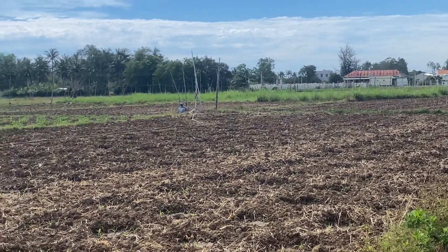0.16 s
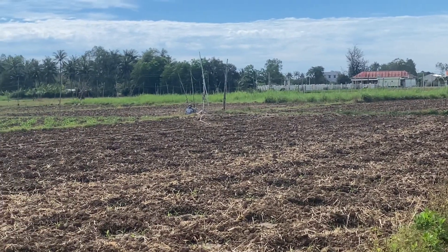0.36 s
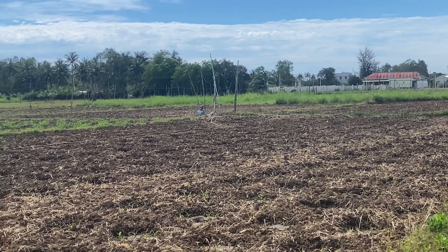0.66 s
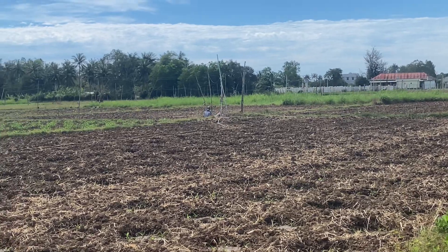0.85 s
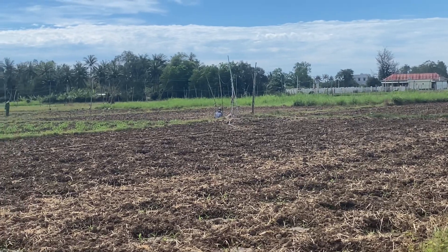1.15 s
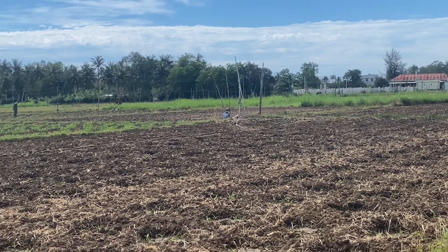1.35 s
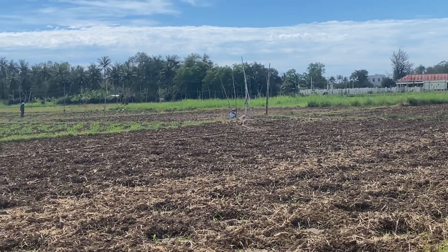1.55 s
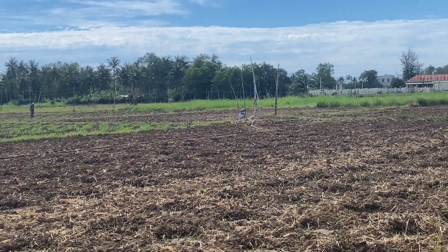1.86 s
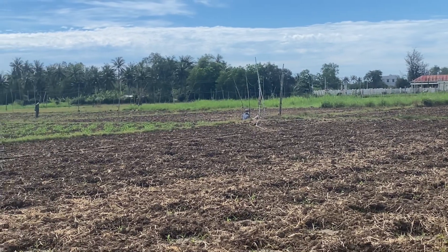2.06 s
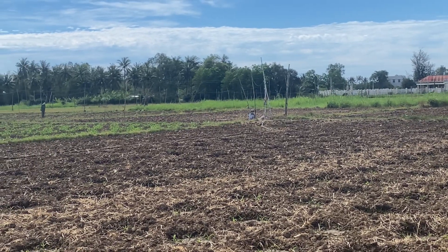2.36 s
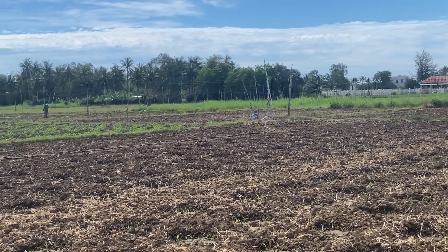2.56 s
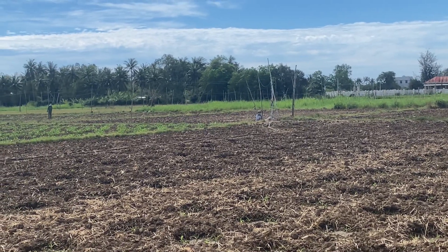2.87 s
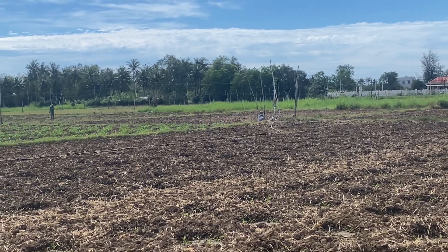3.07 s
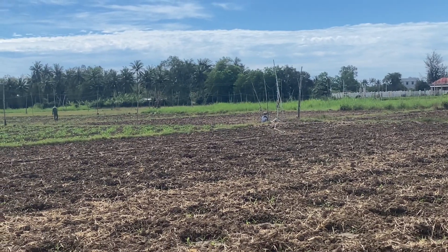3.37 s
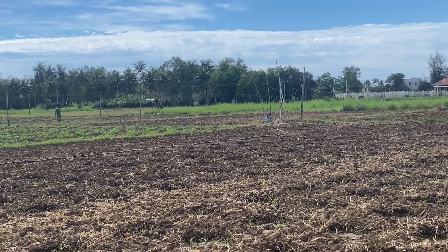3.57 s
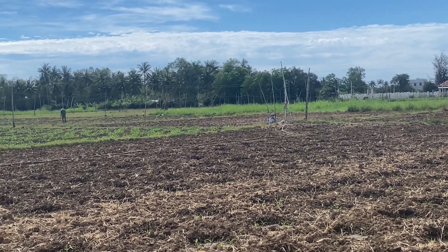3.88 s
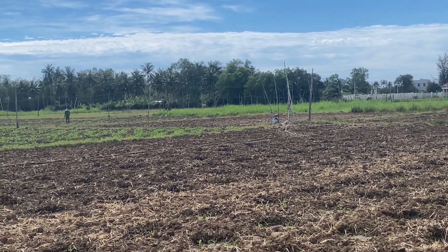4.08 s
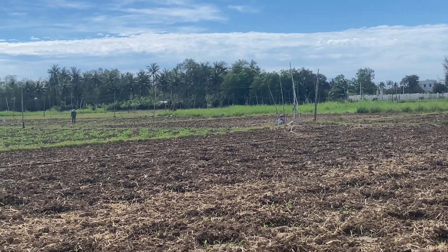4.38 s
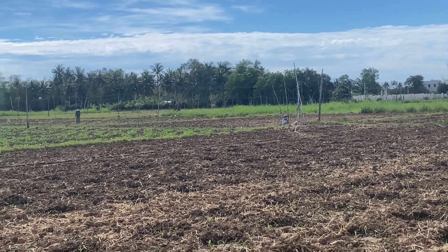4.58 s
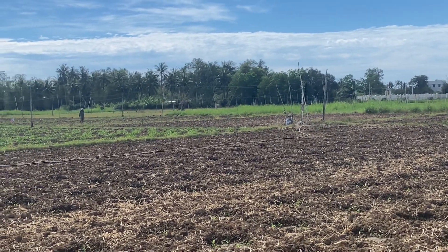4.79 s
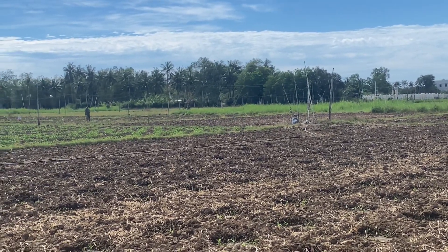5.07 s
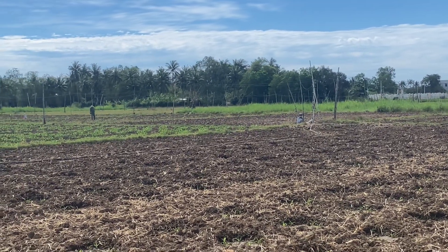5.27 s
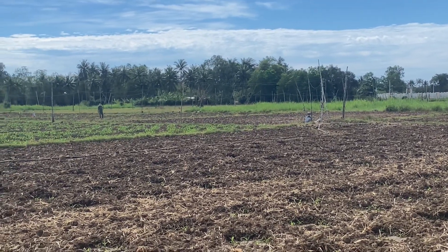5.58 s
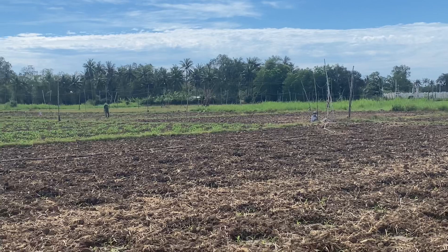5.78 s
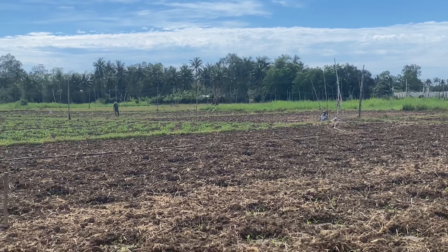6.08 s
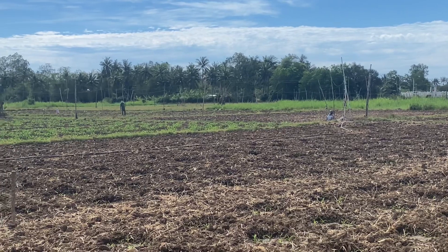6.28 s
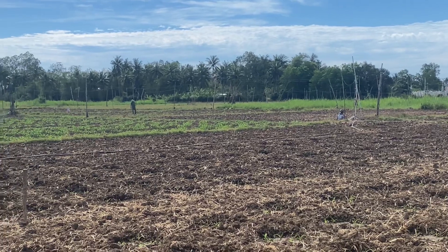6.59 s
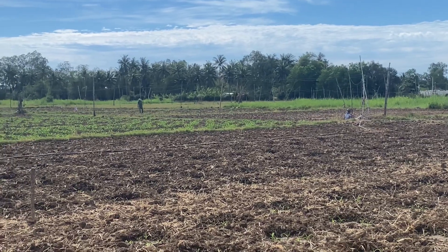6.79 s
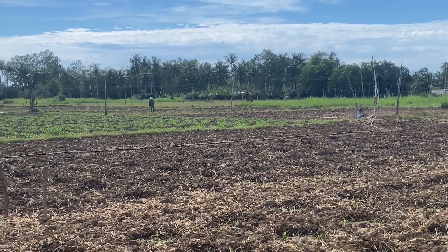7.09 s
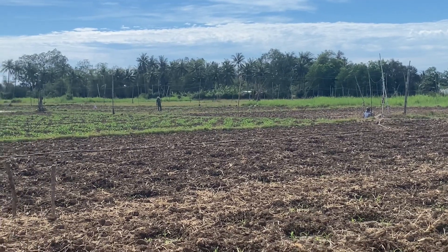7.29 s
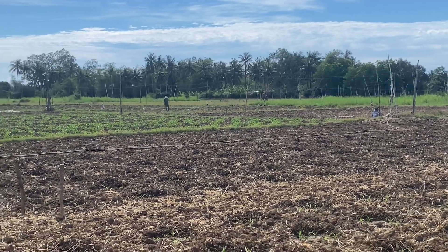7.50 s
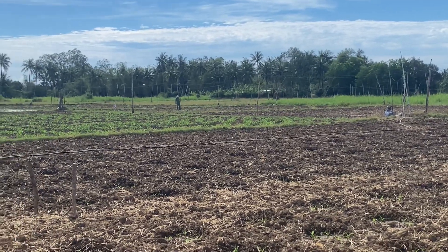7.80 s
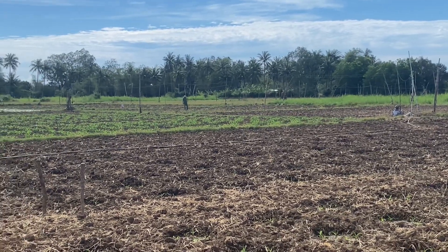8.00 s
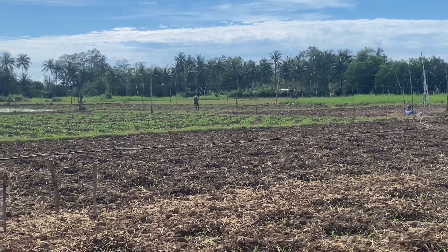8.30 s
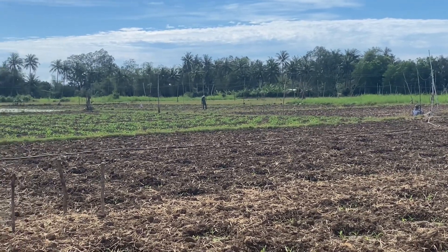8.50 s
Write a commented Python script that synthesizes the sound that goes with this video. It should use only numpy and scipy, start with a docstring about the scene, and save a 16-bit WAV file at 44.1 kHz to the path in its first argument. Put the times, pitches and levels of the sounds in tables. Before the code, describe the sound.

Small birds chirp in the distance as a breeze softly buffets the microphone and a faraway engine faintly chugs.

```python
"""Light wind over open farmland

Turbulent eddies thump on the microphone above the rumble of a light breeze. Small birds chirp all
round at a distance, each call a near-pure tone from the syrinx; lower calls come from the tree line.
Far away a one-cylinder engine chugs, each firing ringing its exhaust pipe. Behind them lie a soft wash
of leaves, a low drone and a brief opening hiss, and the stubble crunches faintly underfoot."""
import sys
import numpy as np
from scipy import signal
from scipy.fft import rfft, irfft, next_fast_len
from scipy.io import wavfile
from scipy.ndimage import uniform_filter1d

SR = 44100
rng = np.random.default_rng(int(sys.argv[2]) if len(sys.argv) > 2 else 0)


def generate_wav(signal):
    """Clip the signal to [-1, 1] and save it as 16-bit WAV at the path in sys.argv[1]."""
    frames = np.transpose(np.atleast_2d(signal))
    scaled = np.clip(frames, -1, 1) * 32767
    pcm = np.round(scaled).astype(np.int16)
    wavfile.write(sys.argv[1], SR, pcm)


N = 381465
TIME = np.arange(N) / SR


# strength of the breeze: (time [s], level [dB])
BREEZE = [(0.0, -58), (0.86, -61.5), (1.03, -62), (1.71, -65), (2.25, -60.5), (2.8, -59.5), (2.98, -53),
          (3.16, -45), (3.44, -64), (3.73, -64.5), (4.17, -58.5), (5.35, -61.5), (5.47, -56.5),
          (6.48, -60.5), (6.82, -76), (7.03, -61), (7.18, -55), (7.68, -58.5), (7.85, -51.5), (8.65, -54.5)]
# spectrum of the turbulence: (frequency [Hz], relative density [dB])
RUMBLE_SPECTRUM = [(12, -56), (25, -36.5), (42, 1), (70, 5.5), (100, -10), (150, -14.5), (250, -22),
                   (600, -53), (2000, -88)]
# large eddies at their crests: (time [s], peak level [dB], frequency [Hz])
LARGE_EDDIES = [(0.052, -34, 115), (0.063, -30, 180), (0.079, -33, 170), (0.099, -35, 95.2),
                (0.375, -43.5, 90), (0.667, -30.5, 94), (0.742, -36, 80), (0.768, -36, 65),
                (1.299, -36.5, 113), (1.365, -47.5, 84.5), (2.268, -44.5, 107), (2.32, -44.5, 68.9),
                (2.45, -48, 69.4), (2.64, -38, 86), (2.915, -36, 90), (2.932, -35.5, 113),
                (3.05, -38.5, 94.6), (3.105, -29, 101.2), (3.14, -25.5, 84.7), (3.156, -21.5, 90),
                (3.255, -29, 82.5), (3.295, -38, 65), (3.972, -30.5, 134), (4.148, -43, 79.1),
                (4.485, -44.5, 90), (4.636, -41, 79.4), (4.69, -46, 95), (5.156, -36, 105),
                (5.55, -38.5, 87.8), (5.6, -37, 101.2), (5.85, -42, 113.5), (5.91, -44, 79.4),
                (6.067, -44.5, 79.5), (6.163, -42, 116), (6.176, -44, 120), (6.27, -48, 93.6),
                (6.365, -39.5, 100), (6.42, -37.5, 122), (7.312, -39, 85.9), (7.663, -39.5, 101),
                (7.757, -34.5, 77), (7.81, -40, 65), (7.9, -34.5, 66.6), (7.951, -29, 80),
                (8.02, -31.5, 70), (8.092, -37.5, 71.6), (8.361, -25, 74.6), (8.433, -39, 60)]

def wind():
    """Turbulence: pressure at the microphone fluctuates as a low rumble with distinct eddies on top."""
    level_db = curve(BREEZE, TIME) + 2.0 * wander(N, hz=11)
    rumble = coloured_noise(RUMBLE_SPECTRUM, patchy_db=1.5) * amp(level_db + 3.0)
    rumble = signal.sosfilt(signal.butter(4, 33, "high", fs=SR, output="sos"), rumble)
    rows = [*LARGE_EDDIES, *small_eddies()]
    shared = eddies(rows, ragged=.11)
    apart = eddies(rows, ragged=.35)  # the swirl differs from port to port
    return (rumble + shared) * amp([[-.3], [.3]]) + amp(-14.5) * np.array([apart, -apart])


def eddies(rows, ragged, rise_cycles=1.277, spread=0.62, sag=1.226, port_hz=48.6):
    """Pressure transients: each eddy slaps the microphone port with a few swings that slow as they die."""
    out, t = np.zeros(N), np.arange(1, SR // 7) / SR
    for start, db, hz in rows:
        rise = rise_cycles / hz
        age = t / rise  # 1 at the crest
        pitch = port_hz + (hz - port_hz) * np.exp(sag * (1 - age))  # sinks towards the port's low limit
        pitch *= np.exp(ragged * wander(len(t), hz=90))
        swing = np.sin(2 * np.pi * (np.cumsum(pitch) / SR + rng.random()))
        envelope = np.exp(-.5 * (np.log(age) / spread) ** 2) * np.cos(np.pi / 2 * t / t[-1])
        add(out, start - rise, amp(db) * envelope * swing)
    return out


def small_eddies(per_second=4, over_breeze_db=8, low_hz=65, high_hz=135):
    """Random arrivals: small eddies scale with the breeze. Returns rows like those of LARGE_EDDIES."""
    when, size, chance = rng.random((100, 3)).T
    crests = when * TIME[-1]
    db = curve(BREEZE, crests) + over_breeze_db
    hz = high_hz * (low_hz / high_hz) ** size
    return np.transpose([crests, db, hz])[chance < per_second * TIME[-1] / len(crests)]


def birds(cutoff_hz=7400):
    """Propagation outdoors: ground and trees scatter the calls, and air absorption removes their top."""
    clear, near, edge = clear_calls(), near_calls(), edge_calls()
    far = rasps() + chatter()
    trees = tree_line_calls()
    mix = (whistles()
           + scattered(clear, wet_db=-6.5, t60=0.15)
           + scattered(near, wet_db=-4.0, t60=0.18)
           + scattered(edge, wet_db=-1.5, t60=0.25)
           + scattered(far, wet_db=3.5, t60=0.1)
           + scattered(trees, wet_db=3.0, t60=0.11))
    return signal.sosfilt(signal.butter(8, cutoff_hz, fs=SR, output="sos"), mix)


def syrinx(length, hz, contour, rough, overtone_db, flutter_db=2.5, sway_db=1.5, trill=0, trill_hz=105):
    """Modulation of a near-pure tone: jitter roughens it, a trill chops it into quick falling pulses."""
    progress = np.linspace(0, 1, int(max(length, .01) * SR))
    size = len(progress)
    at, bend, loudness = np.transpose(contour)
    beat = 2 * np.pi * (trill_hz * length * progress + rng.random() + .15 * wander(size, hz=45))
    waver = 1 + rough * wander(size, hz=460) - trill * np.sin(beat)
    pitch = hz * np.interp(progress, at, bend) * waver
    phase = 2 * np.pi * np.cumsum(pitch) / SR
    overtone = amp(overtone_db) * np.sin(2 * phase) / (1 + (pitch / 3600) ** 10)  # air absorption
    pulses = (1 + np.cos(beat)) if trill else 1
    flutter = amp(flutter_db * wander(size, hz=113) + sway_db * wander(size, hz=26))
    envelope = np.interp(progress, at, loudness) * signal.windows.tukey(size, .15)
    return evened((np.sin(phase) + overtone) * envelope * pulses * flutter)


def calls(rows, contour, **voice):
    """Superposition: calls of one kind share a contour, scaled in duration, pitch and level."""
    out = np.zeros(N)
    for start, length, hz, db in rows:
        add(out, start, amp(db) * syrinx(length, hz, contour, **voice))
    return out


def glides(rows, **voice):
    """Linear frequency sweeps: each call slides from just under its first pitch to its last."""
    out = np.zeros(N)
    for start, length, first_hz, last_hz, db in rows:
        contour = [(0, 0.97, 0.84), (1, last_hz / first_hz, 0.95)]
        add(out, start, amp(db) * syrinx(length, first_hz, contour, overtone_db=-28, **voice))
    return out


# two-note chirrups: (time [s], top pitch [Hz], level [dB])
CHIRRUPS = [(1.043, 3020, -64), (1.2, 2950, -65.5), (1.35, 3200, -64.5), (1.548, 2930, -65.5),
            (1.796, 2956, -66), (2.018, 3000, -67.5), (2.274, 2880, -69.5), (2.536, 2926, -72),
            (2.816, 2980, -70.5), (3.092, 2960, -68), (3.376, 2950, -68), (3.652, 2920, -66.5),
            (3.938, 2940, -66), (4.22, 2950, -65.5), (4.441, 3110, -69), (4.709, 2840, -66.5),
            (4.98, 3000, -67.5), (5.227, 2940, -68), (5.566, 2920, -66), (5.922, 2930, -70)]
# calls over the open field: (time [s], duration [s], reference pitch [Hz], level [dB])
SLURS = [(5.86, .105, 2555, -73.5), (6.24, 0.135, 2590, -68.5)]  # long and falling
SAGS = [(7.755, 0.1, 2560, -72), (8.025, 0.11, 2515, -75), (8.33, .1, 2503, -74.5),
        (8.575, 0.096, 2500, -82)]  # sink and level off
TRILLS = [(6.52, .125, 2540, -73), (6.72, 0.12, 2590, -73.5), (6.915, 0.12, 2570, -70),
          (7.105, 0.11, 2660, -69.5), (7.297, 0.115, 2600, -71), (7.505, 0.115, 2610, -68.5)]  # buzzing
PIPS = [(3.071, 0.026, 3800, -69), (6.71, 0.018, 3600, -78), (6.895, .024, 3670, -71.5),
        (7.089, 0.017, 3720, -65.5), (7.286, 0.013, 3610, -72), (7.497, .02, 3330, -72)]  # sharp, most just ahead of a trill
# their contours: (share of duration [0-1], pitch [ratio], amplitude [0-1])
CHIRRUP_CONTOUR = [(0, .92, 0.5), (.27, 1, 1), (.58, .97, 1), (1, .87, 0.78)]
SLUR_CONTOUR = [(0, 1.34, 0.31), (.25, 1.14, 0.44), (.5, 1.09, 1), (.8, 1.02, 1), (1, 1, .7)]
SAG_CONTOUR = [(0, 1.1, 0.37), (.25, 1.04, 0.54), (.6, 1.01, 1), (1, .99, 0.99)]
TRILL_CONTOUR = [(0, 1.09, 0.77), (.3, 1.01, 0.98), (.75, .99, 1), (1, .98, 0.63)]
PIP_CONTOUR = [(0, 1.06, 0.53), (.55, .98, 1), (1, 1.08, .5)]

def clear_calls(note_s=0.028, step_s=.042):
    """Nearly periodic vibration: a steady syrinx gives the birds over the open field their clear tone."""
    notes = [(start + delay, note_s, hz, db) for start, hz, db in CHIRRUPS for delay in (0, step_s)]
    out = calls(notes, CHIRRUP_CONTOUR, rough=0.0035, overtone_db=-18, flutter_db=1.6, sway_db=3.0)
    out += calls(SLURS, SLUR_CONTOUR, rough=0.003, overtone_db=-26, flutter_db=0.5, sway_db=3.0)
    out += calls(SAGS, SAG_CONTOUR, rough=0.0036, overtone_db=-18, flutter_db=0.6, sway_db=0)
    out += calls(TRILLS, TRILL_CONTOUR, rough=0.013, overtone_db=-37, flutter_db=0.5, sway_db=0,
                 trill=0.066)
    return out + calls(PIPS, PIP_CONTOUR, rough=0.008, overtone_db=-25, flutter_db=1.2)


# high, nearer calls: (time [s], duration [s], reference pitch [Hz], level [dB])
SWEEPS = [(0.13, 0.1, 6310, -70), (0.42, 0.15, 6800, -76), (0.703, 0.13, 6660, -77.5),
          (1.01, 0.1, 6760, -75), (1.3, 0.13, 6670, -80.5), (1.612, .125, 6740, -82.5),
          (1.925, 0.13, 6920, -86), (7.1, .092, 6750, -72)]
ARCHES = [(0.318, 0.108, 6810, -65), (.96, 0.069, 6300, -73), (3.955, 0.11, 6750, -68),
          (4.165, 0.11, 6600, -71.5), (4.587, 0.08, 6700, -79.5), (6.765, .042, 5470, -77)]
DOUBLE_ARCHES = [(3.37, .143, 6670, -62.5)]
# their contours: (share of duration [0-1], pitch [ratio], amplitude [0-1])
SWEEP_CONTOUR = [(0, .66, 1), (.2, .71, 0.84), (.45, .745, 0.6), (.62, .85, .75), (.8, 1, 0.87),
                 (.9, 0.95, 0.7), (1, .99, .25)]
ARCH_CONTOUR = [(0, 0.48, 0.65), (.2, .75, 0.97), (.36, .9, .35), (.5, 0.96, .15), (.64, .93, .2),
                (.76, .73, .6), (.9, .55, 1), (1, 0.62, 0.58)]
DOUBLE_ARCH_CONTOUR = [(0, 0.46, 0.48), (.1, .62, 0.95), (.26, 0.876, 0.74), (0.419, .8, 0.9),
                       (0.522, .81, 0.86), (0.631, 0.99, 0.25), (.76, .96, .45), (0.879, 0.62, 0.51),
                       (1, 0.46, 0.58)]

def near_calls():
    """Wide frequency modulation: the pitch sweeps upward, or arches over one or two crests."""
    out = calls(SWEEPS, SWEEP_CONTOUR, rough=0.009, overtone_db=-30, sway_db=1.0)
    out += calls(ARCHES, ARCH_CONTOUR, rough=0.0513, overtone_db=-22, flutter_db=4.0, sway_db=2.3)
    return out + calls(DOUBLE_ARCHES, DOUBLE_ARCH_CONTOUR, rough=0.02, overtone_db=-3, sway_db=1.0)


# thin calls at the field's edge: (time [s], duration [s], top pitch [Hz], level [dB])
CHIPS = [(.145, 0.048, 5350, -70), (2.845, 0.061, 5330, -83), (7.392, 0.074, 6030, -78),
         (7.64, .07, 5900, -81.5), (7.9, .07, 5820, -84), (8.14, 0.074, 5780, -78.5),
         (8.605, 0.085, 5700, -79)]
TICKS = [(6.765, 0.05, 6550, -80.5), (7.29, 0.029, 6800, -73.5), (7.535, 0.039, 6700, -78),
         (7.795, 0.036, 6660, -79.5), (8.038, 0.026, 6900, -77), (8.278, .036, 6400, -79),
         (8.532, 0.046, 6360, -82)]
# curve of a chip: (share of duration [0-1], pitch [ratio], amplitude [0-1])
CHIP_CONTOUR = [(0, 0.73, 0.69), (.25, .93, .85), (.55, 0.99, .9), (.8, 1, .85), (1, 0.89, 0.38)]

def edge_calls():
    """Tone bursts: brief, high notes with almost no overtone are heard as thin chips and ticks."""
    chips = calls(CHIPS, CHIP_CONTOUR, rough=0.012, overtone_db=-30)
    return chips + calls(TICKS, CHIRRUP_CONTOUR, rough=0.04, overtone_db=-30)


# raspy notes: (time [s], duration [s], pitch [Hz], level [dB])
RASPS = [(1.372, 0.019, 3500, -68.5), (1.535, 0.059, 5700, -79.5), (1.572, 0.025, 3230, -67.5),
         (2.15, 0.041, 4970, -91), (2.335, .07, 5530, -84.5), (2.345, 0.11, 3980, -75),
         (2.445, 0.023, 5100, -83), (3.1, 0.079, 5560, -77.5), (3.14, 0.054, 3210, -74),
         (3.73, 0.095, 5280, -78), (3.732, 0.036, 3370, -68), (3.995, 0.055, 3276, -70),
         (4.125, 0.049, 4640, -70), (4.22, 0.14, 4070, -76), (5.55, 0.1, 5360, -85),
         (5.765, 0.096, 5570, -81), (5.97, 0.063, 5310, -84), (6.26, 0.099, 5050, -81),
         (8.375, 0.075, 5270, -79)]
# their slight fall: (share of duration [0-1], pitch [ratio], amplitude [0-1])
RASP_CONTOUR = [(0, 1.02, 0.87), (0.399, 1.01, 0.96), (1, .97, .5)]

def rasps():
    """Spectral broadening: an unsteady syrinx spreads each tone into a raspy band."""
    return calls(RASPS, RASP_CONTOUR, rough=0.05, overtone_db=-26)


# plain whistles: (time [s], duration [s], first pitch [Hz], last pitch [Hz], level [dB])
WHISTLES = [(0, 0.56, 2573, 2590, -72.5), (0.6, 0.34, 2525, 2520, -76.5), (3.476, 0.3, 2590, 2373, -74),
            (4.045, 0.1, 2415, 2370, -69), (5.44, 0.081, 2480, 2310, -72.5),
            (8.095, 0.073, 2850, 2860, -74)]

def whistles():
    """Amplitude modulation: held notes flutter in level while their pitch moves little."""
    return glides(WHISTLES, rough=0.0092, flutter_db=4.0, sway_db=.6)


# low calls: (time [s], duration [s], first pitch [Hz], last pitch [Hz], level [dB])
HOOTS = [(0.58, 0.2, 1438, 1586, -73.5), (1.22, 0.13, 1025, 941, -73), (1.4, 0.4, 804, 668, -79.5),
         (1.86, 0.22, 1448, 1890, -74), (2.0, 0.25, 1179, 1602, -74.5), (2.13, 0.088, 1620, 1900, -68.5),
         (2.62, 0.11, 2020, 1890, -74), (2.9, 0.14, 984, 923, -71.5), (5.03, 0.068, 770, 818, -74.5),
         (8.04, 0.14, 1890, 1894, -74)]

def tree_line_calls():
    """Frequency jitter: strong random wavering makes the low calls from the trees hoarse."""
    return glides(HOOTS, rough=0.075, flutter_db=2.0, sway_db=0.3)


def chatter(count=400, low_hz=2750, high_hz=5700):
    """Incoherent summation: many birds too far off to tell apart, the higher notes arriving weaker."""
    out = np.zeros(N)
    for when, length, height, slide, loudness in rng.random((count, 5)):
        contour = [(0, 1 - 0.12 * slide, .5), (.5, 0.97, 0.83), (1, 0.79 + 0.12 * slide, 0.44)]
        hz = low_hz * (high_hz / low_hz) ** height
        note = syrinx(0.0242 + .06 * length, hz, contour, rough=0.023, overtone_db=-16,
                      flutter_db=3.0, sway_db=2.0)
        add(out, when * TIME[-1], amp(-82 + 4 * loudness - 8 * height) * note)
    return out


# speed of the engine: (time [s], firing rate [Hz])
FIRING_RATE = [(0, 12.1), (1.55, 12.22), (2.52, 12.7), (3.45, 12.91), (4.38, 12.95), (5.32, 12.77),
               (6.25, 12.84), (7.2, 12.58), (8.2, 12.15)]
# how well its exhaust carries on the wind: (time [s], peak level [dB])
ENGINE_LEVEL = [(0, -69), (2, -60), (3, -53.5), (4.2, -50.5), (4.9, -54.5), (5.6, -50), (6.5, -49),
                (7.1, -53.5), (7.7, -49), (8.6, -53)]
# exhaust pipe resonances: (frequency [Hz], relative level [dB], 60 dB decay time [s])
EXHAUST_MODES = [(146, -10, .08), (425, -6.5, 0.028), (529, 2, 0.023), (740, -13, 0.02)]

def engine(uneven_db=0.5, ragged=0.21, blast_s=0.0013, one_firing_at_s=5.78):
    """Impulse excitation: each firing is a short ragged blast that rings the exhaust pipe's modes."""
    cycles = np.cumsum(curve(FIRING_RATE, TIME)) / SR
    cycles -= np.interp(one_firing_at_s, TIME, cycles)
    firings = TIME[1:][np.diff(np.floor(cycles)) > 0]
    out, t = np.zeros(N), np.arange(SR // 14) / SR
    pipe = sum(amp(db - 60 * t / t60) * np.sin(2 * np.pi * hz * t) for hz, db, t60 in EXHAUST_MODES)
    for start, noise in zip(firings, rng.standard_normal((len(firings), len(t)))):
        gas = noise * np.exp(-t / blast_s)
        blast = (t == 0) + ragged * gas / np.linalg.norm(gas)
        chug = signal.fftconvolve(blast, pipe)[:len(t)]
        peak_db = curve(ENGINE_LEVEL, start) + uneven_db * noise[-1]
        add(out, start, amp(peak_db) * chug / abs(chug).max())
    return out


# spectrum of leaves and countryside: (frequency [Hz], relative density [dB])
WASH_SPECTRUM = [(40, -15), (120, 1.5), (250, 5), (450, 2.5), (700, 0), (1200, -3.5), (1450, -2),
                 (2600, -6), (3300, -12.5), (5400, -19.5), (6500, -33), (7800, -31.5), (11500, -36.5),
                 (14000, -44)]
# strength of its treble: (time [s], level [dB])
WASH_TREBLE = [(0, -66.5), (1.05, -70), (1.7, -68.5), (2.6, -71), (4.1, -68.5), (7.1, -70), (8.65, -72.5)]

def far_wash(body_db=-65, crossover_hz=1200):
    """Broadband noise: distant leaves and countryside merge into an even body under a drifting treble."""
    wash = coloured_noise(WASH_SPECTRUM, patchy_db=2)
    low = signal.sosfiltfilt(signal.butter(2, crossover_hz, fs=SR, output="sos"), wash)
    body = evened(low) * amp(body_db + wander(N, hz=41))
    treble = evened(wash - low) * amp(curve(WASH_TREBLE, TIME) + .5 * wander(N, hz=13))
    return body + treble


# far tones: (frequency [Hz], level [dB], width [Hz])
DRONE_TONES = [(79.2, -63.5, 8.7), (415.8, -78.5, 13), (1464, -83, 24), (2510, -88.5, 58)]

def drone():
    """Narrow-band noise: each far tone wavers at random in amplitude and phase."""
    out = np.zeros(N)
    for hz, db, width in DRONE_TONES:
        phase = 2 * np.pi * hz * TIME
        out += amp(db) * (wander(N, width) * np.cos(phase) + wander(N, width) * np.sin(phase))
    return out


# spectrum of the bright hiss: (frequency [Hz], relative density [dB])
HISS_SPECTRUM = [(600, -41), (1800, -15), (2420, -5), (2560, 12), (2700, -1), (4200, 7), (6200, 2.5),
                 (7800, -5), (9000, -11.5), (13000, -31)]

def hiss(level_db=-66, hold_s=0.32, fade_db_per_s=60):
    """Exponential decay: a bright hiss holds briefly, then dies away."""
    fade_db = fade_db_per_s * np.maximum(TIME - hold_s, 0)
    return coloured_noise(HISS_SPECTRUM, patchy_db=1.5) * amp(level_db - fade_db)


# crunches underfoot: (time [s], peak level [dB], frequency that sets the band [Hz])
CRUNCHES = [(7.405, -66, 8500), (7.462, -74, 6000), (7.641, -49, 1150), (7.654, -49, 950),
            (7.676, -55, 600), (7.717, -49, 1000), (7.755, -54, 500), (8.305, -50, 1050)]

def stubble(decay_s=0.0029):
    """Brittle fracture: dry stalks and clods give way in short noise bursts that swell and die."""
    out, t = np.zeros(N), np.arange(SR // 20) / SR
    for when, db, hz in CRUNCHES:
        band = signal.butter(3, [hz * 0.5, hz * 1.24], "band", fs=SR, output="sos")
        burst = signal.sosfilt(band, rng.standard_normal(len(t)) * t * np.exp(-t / decay_s))
        add(out, when - .004, amp(db) * burst / abs(burst).max())
    return out


# likeness of left and right: (frequency [Hz], correlation [ratio, clipped to +-1 in use])
CORRELATION = [(60, 0.94), (180, 0.86), (350, 0.83), (700, 0.61), (1400, 0.085), (2200, 1), (5000, 0.71),
               (7000, 1), (8500, -1.11), (11000, 0.48)]

def coloured_noise(spectrum, patchy_db):
    """Partial coherence: two channels of shaped noise share a part, with drifting patches of level."""
    hz = np.fft.rfftfreq(2048, 1 / SR)
    left_re, left_im, own_re, own_im, patches = rng.standard_normal((5, N // 512 + 5, len(hz)))
    patches = uniform_filter1d(patches, size=9, axis=0)  # smooth in time
    patches = evened(uniform_filter1d(patches, size=14, axis=1))  # and in frequency
    same = np.clip(log_curve(CORRELATION, hz), -1, 1)
    left = left_re + 1j * left_im
    right = same * left + np.sqrt(1 - same ** 2) * (own_re + 1j * own_im)
    frames = np.array([left, right]) * amp(log_curve(spectrum, hz) + patchy_db * patches)
    _, noise = signal.istft(frames.transpose(0, 2, 1), nperseg=2048, noverlap=1536)
    return evened(noise[:, :N])


def scattered(x, wet_db, t60):
    """Scattering: ground and trees add a thin tail of echoes, a little different at each ear."""
    t = np.arange(SR // 2) / SR
    echoes = rng.standard_normal((2, len(t))) * (rng.random((2, len(t))) < .05) * amp(-60 * t / t60)
    echoes = echoes + .5 * echoes[::-1]  # each side hears some of the other
    tail = signal.fftconvolve(x[None], echoes / np.linalg.norm(echoes[0]), axes=1)[:, :N]
    return x + amp(wet_db) * tail


def wander(size, hz):
    """Low-pass noise: a smooth random drift of rms about 1, moving up to the given rate."""
    length = next_fast_len(max(size, SR // 10))
    smooth = np.exp(-(np.fft.rfftfreq(length, 1 / SR) / hz) ** 2)
    return evened(irfft(rfft(rng.standard_normal(length)) * smooth, length))[:size]


def amp(db):
    """Decibels to amplitude ratio."""
    return 10 ** (np.asarray(db) / 20)


def evened(x):
    """Normalisation to rms 1."""
    return x / np.sqrt(np.mean(x ** 2) + 1e-20)


def curve(points, seconds):
    """Linear interpolation in time."""
    return np.interp(seconds, *np.transpose(points))


def log_curve(points, hz):
    """Interpolation on a log-frequency axis."""
    frequency, value = np.transpose(points)
    return np.interp(np.log(hz + 1), np.log(frequency + 1), value)


def add(mix, seconds, sound):
    """Superposition of a sound on the mix at a given time."""
    part = mix[max(round(seconds * SR), 0):][:len(sound)]
    part += sound[:len(part)]


def scene():
    """Superposition: field, stubble, far engine, birds and wind sum at the microphone."""
    background = far_wash() + drone() + hiss() + stubble()
    return background + scattered(engine(), wet_db=-15.5, t60=0.45) + birds() + wind()


def record(dry):
    """Band limiting: the recorder passes sound up to 13 kHz."""
    lowpass = signal.firwin(511, 13000, window=("kaiser", 9), fs=SR)
    return signal.oaconvolve(dry, lowpass[None], "same")


dry = scene()
out = record(dry)
generate_wav(out)
```